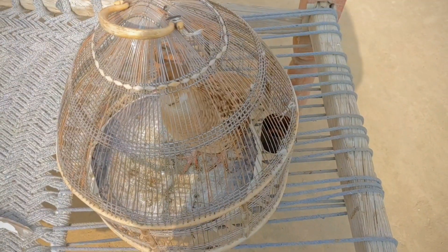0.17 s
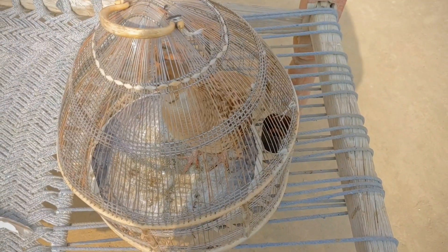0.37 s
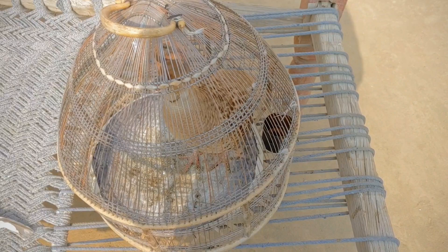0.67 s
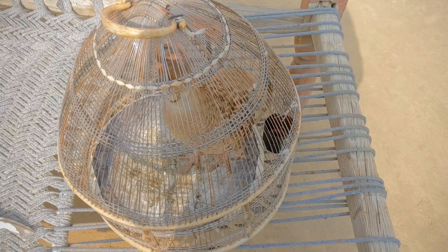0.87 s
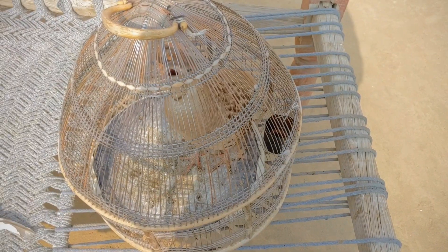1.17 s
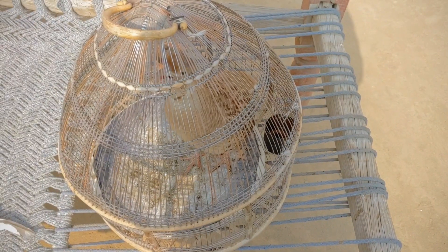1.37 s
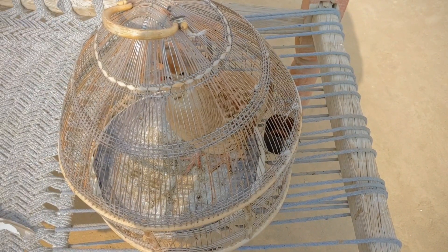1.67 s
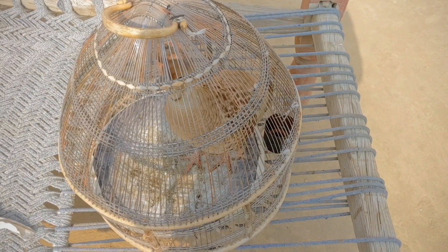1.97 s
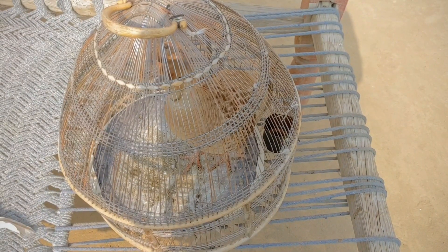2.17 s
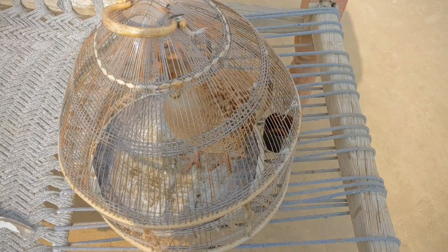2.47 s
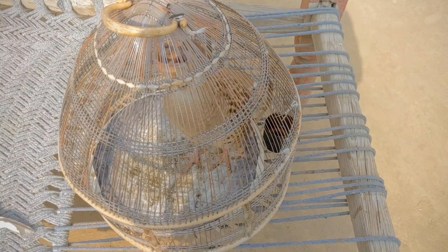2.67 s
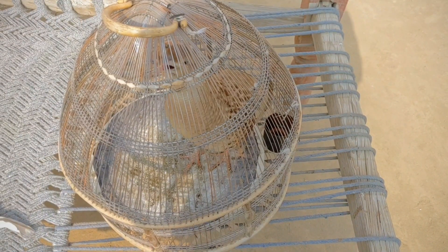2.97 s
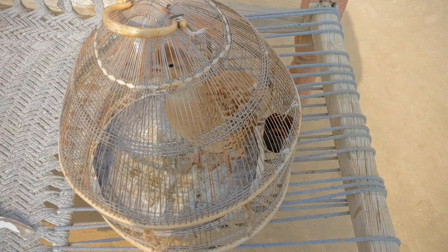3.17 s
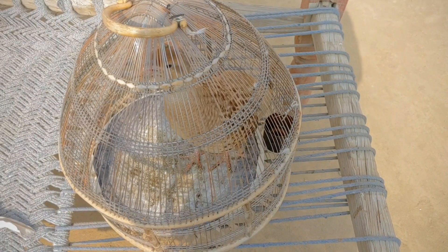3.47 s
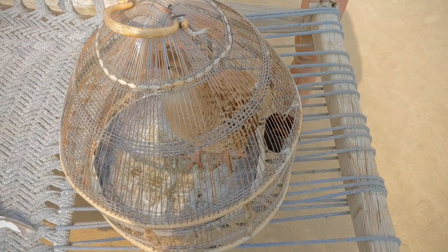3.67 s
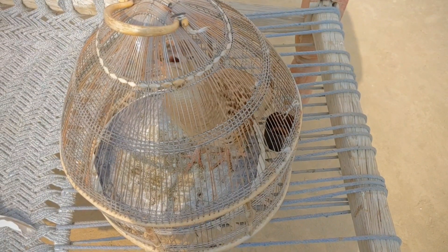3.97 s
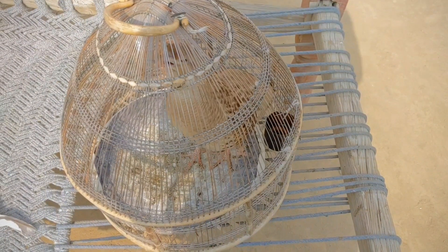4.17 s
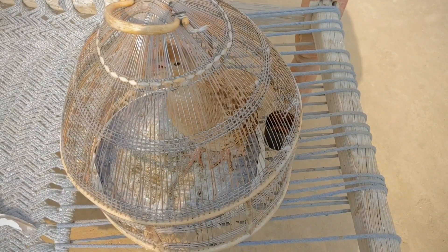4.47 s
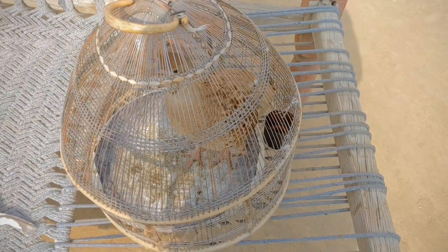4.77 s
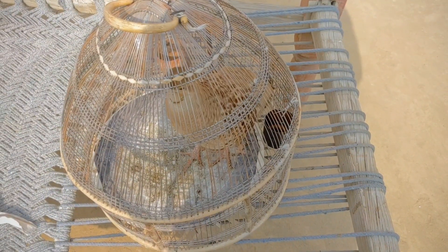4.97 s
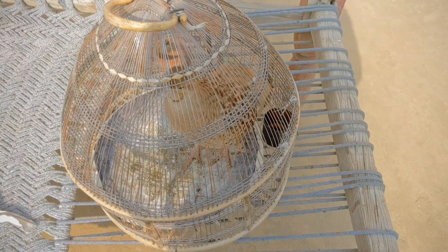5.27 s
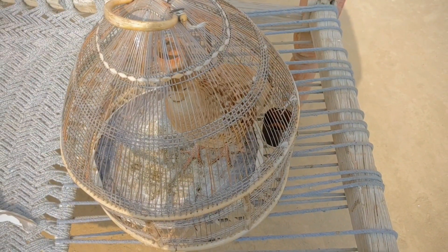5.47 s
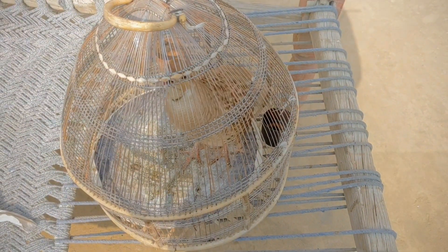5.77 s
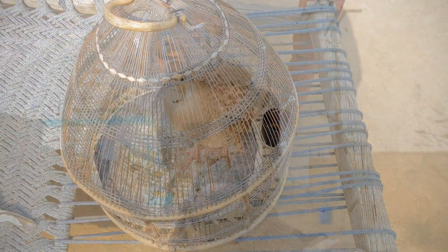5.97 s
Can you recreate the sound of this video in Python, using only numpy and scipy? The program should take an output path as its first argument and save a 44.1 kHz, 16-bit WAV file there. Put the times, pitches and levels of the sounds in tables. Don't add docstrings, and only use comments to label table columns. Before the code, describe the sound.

Loud grating partridge calls jump from throaty rasp to piercing shrill in rhythmic bouts, with soft whistled answers and faint village hum outdoors.

```python
import sys
import numpy as np
from scipy import signal
from scipy.fft import rfft, irfft, next_fast_len
from scipy.io import wavfile
from scipy.ndimage import uniform_filter1d, minimum_filter1d

SR = 44100
rng = np.random.default_rng(int(sys.argv[2]) if len(sys.argv) > 2 else 0)


def store_pcm(level_fs):
    pcm = np.round(np.clip(level_fs, -1, 1) * 32767).astype(np.int16)
    wavfile.write(sys.argv[1], SR, np.atleast_2d(pcm).T)


def undo_db(level):
    steps = np.asarray(level, float) / 20
    return 10 ** steps


N = 269715

# (time [s], length [s], middle pitch [Hz], level [dB])
HOLDS = [
    (1.2175, .048, 1983, -14),
    (2.746, 0.026, 1993, -13.5),
    (3.9865, 0.046, 1980, -13.5),
    (5.7365, 0.043, 1965, -11.5),
]
LEAPS = [
    (2.768, .021, 2555, -18),
]
SLIDES = [
    (1.288, 0.048, 1751, -16.5),
    (2.817, 0.042, 1758, -13),
    (4.056, 0.048, 1762, -14),
    (5.806, .043, 1723, -17.5),
]
DROPS = [
    (1.462, .037, 1639, -18),
    (2.99, .038, 1635, -19),
    (5.982, .038, 1618, -19.5),
]
CUT_DROPS = [
    (4.235, .024, 1740, -16),
]
ARCHES = [(1.595, .017, 2012, -17), (1.712, 0.021, 1974, -21), (1.827, .017, 1927, -18.5),
          (3.123, 0.023, 2027, -19), (3.241, 0.022, 1996, -19), (3.358, 0.017, 1990, -18),
          (4.261, 0.019, 2075, -25), (4.372, 0.027, 2083, -18.5), (4.493, 0.02, 2032, -18),
          (4.61, 0.02, 1995, -16.5)]
HOLD_OVERTONES = [0, -2, -23, -18, -29, -28, -48]
LEAP_OVERTONES = [-4, -1.5, -23, -27, -26]
SLIDE_OVERTONES = [-1, -6.5, -24.5, -28, -44, -57.5]
DROP_OVERTONES = [6.5, -7.5, -21.5, -17.5, -37.5, -51.5]
ARCH_OVERTONES = [0, -15, -30, -42, -50]
HOLD_BEND = (1.032, 1)
LEAP_BEND = (1.005, 1)
SLIDE_BEND = (1.17, .918)
DROP_BEND = (1.075, .9)
CUT_BEND = (1.045, .935)
ARCH_BEND = (1.03, .86)
# (moment [share of length], level [dB])
HOLD_SWELL = [(0, -1.5), (.15, 1), (.6, 1.5), (.88, -1), (1, -4)]
LEAP_SWELL = [(0, 0.00063), (1, 0.0035)]
SLIDE_SWELL = [(0, -5.5), (0.451, 0.5), (0.619, 0), (.75, -9.5), (1, -4)]
DROP_SWELL = [(0, -1.5), (.3, -4), (.75, -1), (1, 2.5)]
ARCH_SWELL = [(0, -3.5), (.3, -2), (.8, -1.5), (1, 0.5)]
# (frequency [Hz], level [dB])
GAPE = [(2500, 1.5), (3300, -9), (4200, 1.5), (5300, 10), (6300, -2.5), (7200, -4.5), (8500, 3),
        (12000, -3)]

# (time [s], length [s], top pitch [Hz], level [dB], crest [share of length], sag before leap [dB])
RISES = [(0.065, .032, 894, -17, 0.52, 1), (0.179, 0.047, 885.4, -25, 0.5, -9.5),
         (0.29, 0.044, 873, -31.5, .55, -11.5), (0.403, 0.031, 764, -33, .6, -4),
         (0.512, 0.035, 643.5, -36, .6, -5.5), (1.44, 0.019, 1057, -20, 0.53, -2.5),
         (1.565, .029, 924, -19, 0.56, -11), (1.681, 0.029, 925.6, -20, 0.57, -12),
         (1.798, 0.03, 933, -24, .45, -9), (1.908, 0.038, 798, -23.5, 0.68, -8.5),
         (2.028, 0.043, 771, -26.5, 0.58, -9), (2.965, 0.025, 1087.5, -19.5, 0.73, -10.5),
         (3.095, 0.026, 929, -18.5, 0.51, -6), (3.211, 0.031, 931, -20, 0.58, -10.5),
         (3.329, 0.032, 880, -26, .55, -15.5), (3.453, 0.032, 921, -26, 0.44, -8),
         (3.578, .03, 813, -27, 0.59, -10.5), (4.212, 0.021, 1059, -20.5, 0.57, -1.5),
         (4.342, .032, 943, -21, 0.54, -10), (4.463, .027, 882, -19.5, 0.72, -12.5),
         (4.581, 0.028, 936, -22.5, 0.51, -9), (4.693, .045, 795, -23.5, 0.76, -10),
         (4.825, 0.05, 758.4, -26, .6, -12.5), (5.956, .027, 1013, -20.5, 0.63, -10.5),
         (6.083, .031, 1053, -18.5, .6, -4.5)]
# (time [s], start pitch [Hz], level [dB], beak opening [dB])
FALLS = [(.099, 735, -17.5, -15), (.216, 716, -18.5, -21), (0.326, 750.5, -21, -17.5),
         (0.436, 698, -25.5, -17.5), (.55, 600, -31, -15.5), (1.495, 664, -36, -17.5),
         (1.609, 691, -32.5, -11), (1.729, 660, -32.5, -22.5), (1.838, 693.5, -25, -17.5),
         (1.942, 668.5, -21.5, -9.5), (2.066, 649, -29.5, -16.5), (3.024, 665, -35.5, -15),
         (3.143, 646, -33.5, -11), (3.253, 682, -30, -17.5), (3.371, 665.6, -26, -15),
         (3.482, 751, -18.5, -12.5), (3.609, 689, -25.5, -17), (4.275, 691, -37, 3), (4.393, 685, -30, -10),
         (4.506, 642, -30.5, -5), (4.625, 678, -27.5, -7.5), (4.737, 699, -21.5, -7.5),
         (4.873, 669, -28.5, -8.5), (6.017, 678, -33.5, -21)]
# (time [s], length [s], top pitch [Hz], level [dB])
ARCS = [
    (0.615, 0.072, 480, -31),
    (0.737, 0.059, 423.8, -33.5),
    (0.884, 0.026, 289, -48.5),
    (2.154, 0.066, 535, -27.5),
    (2.288, 0.057, 290.3, -43.5),
    (3.69, 0.055, 521.6, -31.5),
    (4.956, 0.066, 464.7, -30),
]
# (time [s], length [s], level [dB])
BLASTS = [
    (1.165, 0.049, -18),
    (2.696, 0.045, -17),
    (3.938, .049, -17),
    (5.685, 0.049, -18.5),
]
# (time [s], length [s], level [dB])
BRIDGES = [
    (1.264, 0.023, -34),
    (2.786, .031, -30),
    (4.029, 0.031, -32),
    (5.779, 0.028, -37),
]
# (start [Hz], end [Hz])
BLAST_HZ = (597.5, 1097)
BRIDGE_HZ = (986, 864)
# (frequency [Hz], level [dB])
STRETCHED_THROAT = [(60, -81.5), (250, -23), (500, -14.5), (680, -16), (900, -19), (1080, -16.5), (1330, 8),
                    (1560, 1), (1900, 5), (2250, -4), (2500, -25), (3200, -68.5)]
FALLING_THROAT = [(60, -71), (250, -21), (450, -27.5), (700, -28.5), (1000, -9.5), (1330, 8), (1600, 0),
                  (1900, -3.5), (2250, -19.5), (2500, -17), (3200, -62.5)]
SLACK_THROAT = [(60, -66.5), (250, -7.5), (500, -28.5), (950, -10), (1330, 6.5), (1600, -0.5), (1900, -5.5),
                (2250, -24.5), (2500, -16.5), (3200, -69)]
OPEN_BEAK = [(1800, -101), (2450, -2), (2800, -6.5), (3150, -4), (3550, -1), (4200, -5), (4750, -8.5),
             (5450, -2.5), (6300, -15.5), (6900, -11.5), (7300, -29), (7900, -20), (8600, -18),
             (10500, -16.5), (11900, -30.5), (13200, -30.5), (14600, -29), (15300, -44)]
SHUT_BEAK = [(1900, -73.5), (2400, -14), (2800, -0.5), (3400, -7), (4200, -3), (4850, -13), (5500, -1),
             (6300, -19), (6950, -13), (7600, -31.5), (8300, -20.5), (8900, -25.5), (9500, -19),
             (10500, -28), (12000, -23.5), (13300, -31), (14600, -31.5), (15300, -50)]

# (time [s], level [dB], start pitch [Hz], end pitch [Hz])
SNAPS = [(1.592, -12.5, 1370, 2030), (1.709, -15, 1366, 2056), (1.824, -17, 1350, 2087),
         (3.119, -14.5, 1344, 2230), (3.237, -14.5, 1324, 1960), (3.357, -15.5, 1300, 2040),
         (4.37, -13.5, 1500, 2185), (4.49, -12, 1345, 2020), (4.607, -14, 1406, 2140),
         (0.211, -28, 1530, 2150), (3.479, -19, 1480, 2037), (4.735, -22, 1720, 1970),
         (.327, -23, 1526, 1910), (1.607, -21, 1950, 1390), (1.728, -20.5, 1880, 1340),
         (1.839, -21, 1952, 1384), (3.144, -26, 1860, 1383), (3.258, -25, 1864, 1430),
         (4.275, -21.5, 1970, 1400), (4.393, -19, 1810, 1370), (4.51, -22.5, 2030, 1420),
         (4.626, -18, 1878, 1410)]
BREAKS = [
    (1.262, -31, 1943, 1520),
    (2.786, -25.5, 2600, 1830),
    (4.027, -26, 1940, 1560),
    (5.779, -31.5, 1990, 1516),
    (1.284, -27.5, 1690, 2175),
    (2.813, -23.5, 1737, 2170),
    (4.052, -27.5, 1760, 2215),
    (5.802, -24.5, 1680, 2130),
]
SNAP_OVERTONES = [6.5, -21.5, -16, -36]

# (time [s], length [s], top pitch [Hz], level [dB], fade [dB], swell in the middle [dB])
WHISTLES = [
    (0.362, 0.26, 1663, -22.5, -1.5, 2),
    (0.967, 0.25, 1732, -20.5, -3.5, 3.7),
    (1.877, 0.32, 1763, -22, -11.5, -5.1),
    (2.506, 0.21, 1737, -19.5, -10, 1.2),
    (3.618, 0.311, 1749, -27.5, 2, 2.7),
    (4.65, 0.3, 1758, -19.5, -6, -1.5),
    (5.386, 0.29, 1770, -17, -10, 3.1),
]
# (frequency [Hz], level [dB])
BREATH = [(600, -35.5), (1200, -18.5), (1800, 2.5), (2600, -9), (4000, -23.5), (9000, -34), (11000, -61)]
# (time [s], level [dB])
THUDS = [
    (0.344, -47),
    (0.913, -38.5),
    (1.764, -43.5),
    (2.445, -39.5),
    (3.555, -41.5),
    (4.554, -38),
    (5.336, -35.5),
]
# (start [Hz], end [Hz])
THUD_HZ = (249.4, 112.4)

# (time [s], length [s], level [dB])
HOARSE = [
    (-.3, 0.37, -34),
    (0.437, 0.31, -40),
    (5.121, .33, -37.5),
]
# (frequency [Hz], level [dB per Hz])
HOARSE_THROAT = [(290, -76.5), (500, -34), (620, -48.5), (780, -22), (860, -14.5), (960, -28.5),
                 (1290, -42), (1390, -21.5), (1560, -24), (1870, 1), (2000, -14), (2180, -30),
                 (2900, -34.5), (3350, -39.5), (4000, -32), (4200, -21.5), (4450, -35.5), (5000, -44),
                 (5550, -37.5), (5750, -30), (6000, -43), (6300, -46), (6910, -30.5), (7500, -41.5),
                 (9500, -44.5), (10500, -71), (14300, -89.5), (22000, -120)]
# (time [s], length [s], start pitch [Hz], end pitch [Hz], level [dB])
CHIRPS = [
    (1.878, .04, 3750, 3520, -52),
    (1.91, .07, 3600, 3620, -58),
    (2.0, .055, 3580, 3620, -53),
    (2.075, .085, 3600, 3560, -60),
    (2.37, .014, 2000, 3000, -65),
    (2.39, .012, 2200, 3000, -66),
]
# (time [s], length [s], pitch [Hz], level [dB])
COOS = [
    (2.411, .04, 297, -62),
    (5.126, 0.076, 251.7, -64),
    (5.486, .16, 239.4, -59.5),
]

# (frequency [Hz], level [dB per Hz]); the breeze differs at each port
HUM = [(15, -45), (40, -25), (90, -16), (150, -11), (260, 1), (600, -14), (900, -14.5), (1760, -11.5),
       (3200, -23.5), (15000, -42.5)]
BREEZE = [(15, -26.5), (30, -12), (70, -7.5), (110, -10.5), (200, -42)]
# (frequency [Hz], level [dB])
THUMP = [(15, -13), (40, -3), (90, -1.5), (200, -12), (500, -39.5), (2000, -78.5)]

# (frequency [Hz], time [s])
YARD_T60 = [(500, 0.96), (1300, 0.16), (2000, 0.71), (3500, 0.3), (8000, 0.3)]
# (frequency [Hz], level [dB])
YARD_TONE = [(500, -7.5), (1000, 4), (1400, -2), (2000, -6), (2400, -7), (2800, 4.5), (3300, -6),
             (6000, -4), (12000, -6)]
# (frequency [Hz], left over right [dB])
NEAR_BALANCE = [(60, 10.5), (99, -6), (160, 1.5), (270, -1.5), (450, -0.5), (730, -0.5), (1210, 2.5),
                (2000, 8), (3300, 16.5), (5450, 19), (9000, 46.5), (14900, -1)]
MATE_BALANCE = [(300, 0.5), (1200, 6.7), (2000, 17), (3300, 15), (9000, 43), (15000, 2.5)]
# (frequency [Hz], left leads by [radians])
NEAR_LEAD = [(0, 0), (1890, -1.1), (2330, -4.2), (3190, -5.9), (5680, -9.2), (7490, -8.3), (7920, -10.5),
             (9910, -13.4), (12000, -13.8), (12800, -15.8), (14000, -15.8), (15100, -18.5)]
MATE_LEAD = [(0, 0), (700, 0), (1300, -2.2), (2000, -2.7), (15000, -3)]
# (frequency [Hz], width [Hz], level [dB])
NOTCHES = [(10470, 350, -14.5), (11500, 130, -9), (13900, 300, -13), (15300, 300, -11.5)]


def evened(x):
    return x / np.sqrt(np.mean(x ** 2) + 1e-20)


def read(points, hz):
    f, value = np.transpose(points)
    return np.interp(np.log(hz + 1), np.log(f + 1), value)


def add(mix, s, sound):
    part = mix[round(s * SR):][:len(sound)]
    part += sound[:len(part)]


def colour(x, points):
    log_gain = np.log(undo_db(read(points, abs(np.fft.fftfreq(4096, 1 / SR)))))
    phase = -signal.hilbert(log_gain).imag
    taps = np.fft.ifft(np.exp(log_gain + 1j * phase)).real[:1024]
    return signal.oaconvolve(x, taps)[:len(x)]


def drift(length, size):
    return evened(uniform_filter1d(uniform_filter1d(rng.standard_normal(length), size), size))


def hum():
    takes = []
    for _ in range(2):
        noise = evened(colour(rng.standard_normal(N), HUM))
        takes.append(noise * undo_db(-63.5 + 3.5 * drift(N, size=2500)))
    whine = undo_db(-90) * np.sin(2 * np.pi * 15262 * np.arange(N) / SR)
    return np.array(takes) + whine


def drone():
    centre_hz, width_hz = 145, 29
    hz = np.fft.rfftfreq(N, 1 / SR)
    tone = irfft(rfft(rng.standard_normal(N)) * np.exp(-((hz - centre_hz) / width_hz) ** 2), N)
    return evened(tone) * undo_db(-67.5 + 1.2 * drift(N, size=5000))


def breeze():
    takes = []
    for _ in range(2):
        air = evened(colour(rng.standard_normal(N), BREEZE))
        takes.append(air * undo_db(-77 + 2.7 * drift(N, size=4000)))
    return np.array(takes)


def dove():
    out = np.zeros(N)
    for s, length, hz, db in COOS:
        t = np.arange(0, length, 1 / SR)
        add(out, s, undo_db(db + 2) * np.sin(2 * np.pi * hz * t) * signal.windows.tukey(len(t), .6))
    return out


def small_bird():
    out = np.zeros(N)
    for s, length, hz0, hz1, db in CHIRPS:
        tone = shrill(length, hz0, (hz0 + hz1) / 2, hz1, db, [0, -24], -3.3)
        flutter = undo_db(2.5 * drift(len(tone), size=150))
        add(out, s, tone * flutter * signal.windows.tukey(len(tone), .7))
    return out


def hoarse():
    pulse_hz, swell_s, steady_after_s, die_db_per_s = 81.3, .17, .14, 250.5
    t = np.arange(N) / SR
    level, steady = np.zeros(N), np.zeros(N)
    for s, length, db in HOARSE:
        swell = np.clip((t - s) / swell_s, 0, 1) ** 2
        level += swell * undo_db(db - die_db_per_s * np.maximum(t - s - length, 0))
        settled = np.clip((t - s - steady_after_s) / .03, 0, 1) * (t < s + 2 * length)
        steady = np.maximum(steady, settled)
    drive = (.15 + .3 * steady) * pulses(np.full(N, pulse_hz), .06)
    drive += (1 - .35 * steady) * rng.standard_normal(N)
    breathy = (1 - steady) * rng.standard_normal(N)
    croak = evened(colour(breathy, [(1000, -37), (1400, -.5), (1700, -38.5)]))
    return (evened(colour(drive, HOARSE_THROAT)) + undo_db(-10.5) * croak) * level


def throat_thuds():
    out, u = np.zeros(N), np.linspace(0, 1, round(.085 * SR))
    hz = np.interp(u ** .65, [0, 1], THUD_HZ)
    thud = np.sin(2 * np.pi * np.cumsum(hz) / SR) * np.minimum(u / .29, 1) * (1 - u) ** 1.52
    for s, db in THUDS:
        add(out, s, undo_db(db + 3.5 * drift(len(u), size=250)) * thud)
    return out


def mate_whistles():
    crest_s, climb_hz_per_s2, sag_hz_per_s2 = .147, 6500, 5000
    attack_s, release_s = .028, .018
    out = np.zeros(N)
    for s, length, top_hz, db, fade_db, swell_db in WHISTLES:
        t = np.arange(0, length, 1 / SR)
        hz = top_hz - np.where(t < crest_s, climb_hz_per_s2, sag_hz_per_s2) * (t - crest_s) ** 2
        turn = 2 * np.pi * np.cumsum(hz * (1 + .002 * drift(len(t), size=200))) / SR
        air = undo_db(-37) * evened(uniform_filter1d(drift(len(t), size=30), size=30))
        tone = (np.sqrt(2) + air) * np.cos(turn)
        tone += undo_db(-46 + 5 * drift(len(t), size=500)) * np.cos(2 * turn)
        tone += undo_db(-33) * evened(colour(rng.standard_normal(len(t)), BREATH))
        edges = np.minimum(t / attack_s, 1) ** 2 * np.minimum((length - t) / release_s, 1)
        level = db + fade_db * t / length + swell_db * np.sin(np.pi * t / length) ** 2
        add(out, s, tone * edges * undo_db(level + 1.2 * drift(len(t), size=500)))
    return out


def pulses(hz, rough):
    turns = np.cumsum(hz * (1 + .11 * rough * drift(len(hz), size=40))) / SR
    clicks = np.diff(np.floor(turns), prepend=0) * undo_db(3 * rough * rng.standard_normal(len(hz)))
    early = np.clip(turns % 1 / np.diff(turns, prepend=0), 0, 1)
    clicks = clicks * (1 - early) + np.append((clicks * early)[1:], 0)
    puffs = np.exp(-(turns % 1) / .3) * rng.standard_normal(len(hz))
    return evened(clicks) + .42 * rough * evened(puffs)


def rasp(hz, swell, db, beak_db, rough, throat, ground):
    drive, rest = pulses(hz, rough), np.zeros(400)
    hiss = rng.standard_normal(len(hz)) * undo_db(1.9 * drift(len(hz), size=60))
    airy = drive + .9 * np.sqrt(rough) * hiss
    tone = ground * np.sin(2 * np.pi * np.cumsum(hz) / SR)
    low = evened(colour(np.append((drive + tone) * swell, rest), throat))
    beak = OPEN_BEAK if beak_db > 5 else SHUT_BEAK
    beak = [(f, d - .5 * beak_db * (f > 9510)) for f, d in beak]
    high = evened(colour(np.append(airy * swell ** .99, rest), beak))
    treble = np.clip(undo_db(beak_db - 12.5), 0, .9)
    return undo_db(db) * (np.sqrt(1 - treble ** 2) * low + treble * high)


def rise(s, length, hz0, hz1, db, beak_db, crest=.54, sag_db=-1):
    lead = .006 * (hz0 < 470) + .002 * (470 <= hz0 < 560)
    u = np.linspace(0, 1, round((length + lead) * SR))
    wide = np.clip((beak_db + 5) / 12, 0, 1)
    moments = [0, crest / 2, crest, (crest + 1) / 2, 1]
    heights = [.01 + .05 * wide ** 2, .1 + .8 * wide ** 3, 1, undo_db(.75 * sag_db), undo_db(sag_db)]
    beads_db = 2.3 * drift(len(u), size=150)
    catch_db = -9 * wide ** 3 * np.exp(-((u - .5) / .09) ** 2)
    swell = np.interp(u, moments, heights) * undo_db(beads_db + catch_db)
    hz = hz0 + (hz1 - hz0) * np.sin(u * np.pi / 2 * (1 + .36 * (1 - wide)))
    ground = (.5 + 3.4 * wide ** 3) * u ** 1.2 * np.minimum((1 - u) / .15, 1)
    return s - lead, rasp(hz, swell, db, beak_db, .62 - .05 * wide, STRETCHED_THROAT, ground)


def rasps():
    out = np.zeros(N)
    for s, length, db in BLASTS:
        add(out, *rise(s, length, *BLAST_HZ, db, 10.5))
    for s, length, db in BRIDGES:
        add(out, *rise(s, length, *BRIDGE_HZ, db, 13.5))
    for s, length, hz, db, crest, sag_db in RISES:
        beak_db = .029 * (hz - 1042)
        add(out, *rise(s, length, .49 * hz, hz, db, beak_db, crest, sag_db))
    u = np.linspace(0, 1, round(.03 * SR))
    fall = np.minimum(u / .1, 1) * (1 - u ** 1.6) ** 1.2
    for s, hz, db, beak_db in FALLS:
        rough = .3 if db > -23 else .55
        add(out, s, rasp(hz * (1 - .5 * u ** 2.2), fall, db, beak_db, rough, FALLING_THROAT, .1))
    for s, length, hz, db in ARCS:
        arch = abs(np.sin(np.pi * np.linspace(0, 1, round(length * SR)) ** .85))
        pitch = hz * (.26 + .74 * arch ** .45)
        add(out, s, rasp(pitch, arch ** 1.2, db, -12.5, .2, SLACK_THROAT, .45))
    return out


def snaps():
    out, u = np.zeros(N), np.linspace(0, 1, round(.0075 * SR))
    for rows, bright_db in [(SNAPS, 0), (BREAKS, 19.5)]:
        for s, db, hz0, hz1 in rows:
            hz = (hz0 + (hz1 - hz0) * u) * (1 + .06 * drift(len(u), size=25))
            turn = 2 * np.pi * np.cumsum(hz) / SR
            stack = np.zeros(len(u))
            for k, level in enumerate(SNAP_OVERTONES):
                if k > 0:
                    level = level + bright_db + 3 * drift(len(u), size=30)
                stack += undo_db(level) * np.cos((k + 1) * turn)
            add(out, s, undo_db(db - 2.5) * stack * np.sin(np.pi * u) ** .62)
    return out


def shrill(length, hz0, hz1, hz2, db, overtones_db, fade_db, shape=((0, 0), (1, 0))):
    u = np.linspace(0, 1, round(length * SR) + 130)
    hz = np.polyval(np.polyfit([.08, .5, .92], [hz0, hz1, hz2], 2), u)
    turn = 2 * np.pi * np.cumsum(hz * (1 + .004 * drift(len(u), size=60))) / SR
    stack = np.zeros(len(u))
    for k, level in enumerate(overtones_db):
        if k > 0:
            level = level + read(GAPE, (k + 1) * hz) + 2 * fade_db * (u ** 3 - .2156)
        flutter_db = np.sqrt(k) * drift(len(u), size=90)
        stack += undo_db(level + flutter_db) * np.cos((k + 1) * turn)
    swell_db = db + fade_db * (u ** 2 - 1.0329) + np.interp(u, *np.transpose(shape))
    swell = undo_db(swell_db + drift(len(u), size=150))
    airy_beak = [(f, d + 8.5 * (f > 7000)) for f, d in OPEN_BEAK]
    air = undo_db(-24) * evened(colour(rng.standard_normal(len(u)), airy_beak)) * (len(overtones_db) > 1)
    edges = np.minimum(u * length / .002, 1) * np.minimum((1 - u) * length / .005, 1)
    return (evened(stack) + air) * swell * edges


def shrills():
    out = np.zeros(N)
    kinds = [(HOLDS, HOLD_BEND, HOLD_OVERTONES, -4.5, HOLD_SWELL),
             (LEAPS, LEAP_BEND, LEAP_OVERTONES, -1.5, LEAP_SWELL),
             (SLIDES, SLIDE_BEND, SLIDE_OVERTONES, -4, SLIDE_SWELL),
             (CUT_DROPS, CUT_BEND, DROP_OVERTONES, -9.5, DROP_SWELL),
             (DROPS, DROP_BEND, DROP_OVERTONES, -9.5, DROP_SWELL),
             (ARCHES, ARCH_BEND, ARCH_OVERTONES, -3, ARCH_SWELL)]
    for rows, (start, end), overtones_db, fade_db, shape in kinds:
        for s, length, hz, db in rows:
            note = shrill(length, start * hz, hz, end * hz, db, overtones_db, fade_db, shape)
            add(out, s - .0015, note)
    return out


def partridge():
    return snaps() + shrills() + rasps()


def cage(x):
    t = np.arange(3000) / SR
    taps = rng.standard_normal(3000) * (rng.random(3000) < .03) * (t > .0015) * undo_db(-60 * t / .04)
    x = x + undo_db(-21.5) * np.append(np.zeros(round(.026 * SR)), x)[:N]
    return x + undo_db(-18) * signal.oaconvolve(x, taps / np.linalg.norm(taps))[:N]


def yard(x):
    taps = np.zeros((2, SR))
    at = np.arange(200, SR - 20, 20) + rng.integers(0, 20, (2, (SR - 201) // 20))
    np.put_along_axis(taps, at, rng.choice([-1., 1.], at.shape), 1)
    hz, t, bands = signal.stft(taps, SR, nperseg=256)
    decay_db = read(YARD_TONE, hz)[:, None] - 60 * t / read(YARD_T60, hz)[:, None]
    tail = signal.istft(bands * undo_db(decay_db), SR, nperseg=256)[1]
    return undo_db(-20) * signal.fftconvolve(x[None], tail / np.linalg.norm(tail[0]), axes=1)[:, :N]


def alike(pair, same):
    return np.array([pair[0], same * pair[0] + np.sqrt(1 - same ** 2) * pair[1]])


def ports(x, balance, lead):
    size = next_fast_len(N + 4096)
    hz = np.fft.rfftfreq(size, 1 / SR)
    right = undo_db(-read(balance, hz)) * np.exp(-1j * np.interp(hz, *np.transpose(lead)))
    notch_db = sum(db * np.exp(-((hz - f) / width) ** 2) for f, width, db in NOTCHES)
    left = 2 / abs(1 + right) * undo_db(notch_db)
    return irfft(rfft(x, size) * [left, left * right], size)[:, :N]


def membrane_thump(near):
    shake = 1500 * uniform_filter1d(near ** 2, size=3000) ** 2
    return undo_db(-53) * np.array([colour(rng.standard_normal(N) * shake, THUMP) for _ in range(2)])


def scene():
    near = cage(partridge())
    far = mate_whistles() + hoarse() + small_bird()
    loud_db = 10 * np.log10(abs(uniform_filter1d(near ** 2, size=11000)) + 1e-9)
    ducked = (hum() + [drone(), drone()]) * undo_db(-.6 * np.maximum(loud_db + 28, 0))
    around = alike(yard(near + far), .7) + alike(ducked, .85)
    close = ports(near, NEAR_BALANCE, NEAR_LEAD)
    distant = ports(far + throat_thuds() + dove() + around, MATE_BALANCE, MATE_LEAD)
    return close + distant + breeze() + membrane_thump(near)


def top_cut(x):
    return signal.sosfilt(signal.butter(12, 15460, fs=SR, output="sos"), x)


def record(dry):
    room = np.minimum(.95 / (abs(dry).max(0) + 1e-9), 1)
    limited = dry * uniform_filter1d(minimum_filter1d(room, 200), 200)
    low_pass = signal.firwin(1023, 15400, window=("kaiser", 9), fs=SR)
    mix = signal.oaconvolve(limited, low_pass[None], "same")
    return top_cut(mix)


dry = scene()
out = record(dry)
store_pcm(out)
```